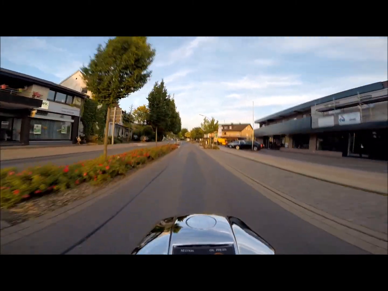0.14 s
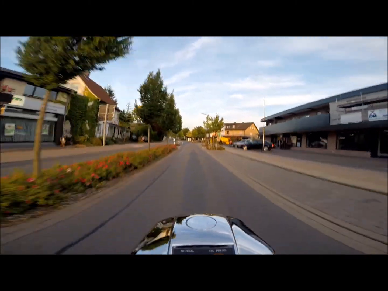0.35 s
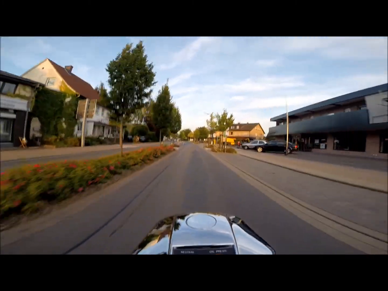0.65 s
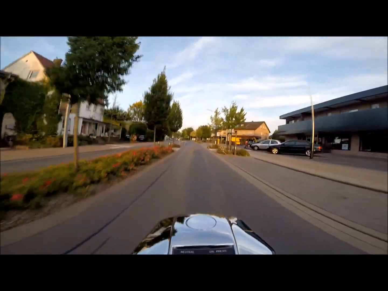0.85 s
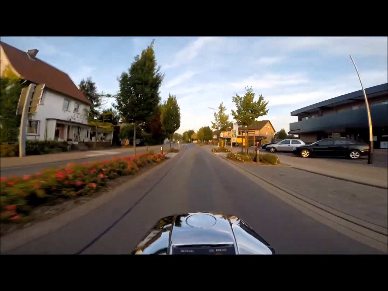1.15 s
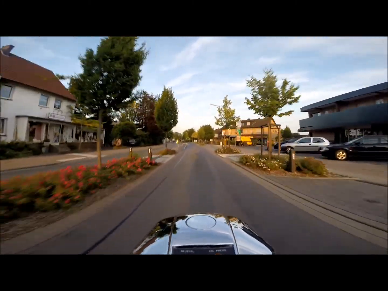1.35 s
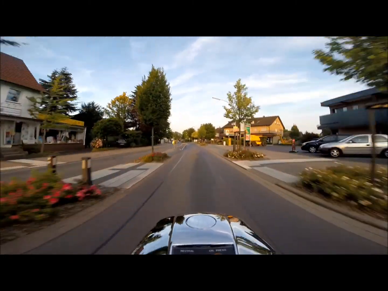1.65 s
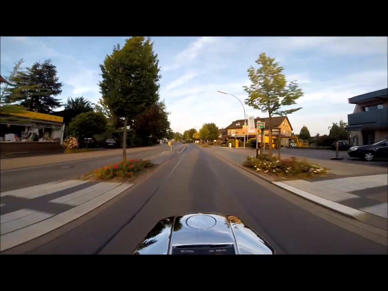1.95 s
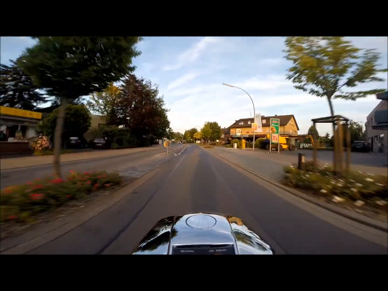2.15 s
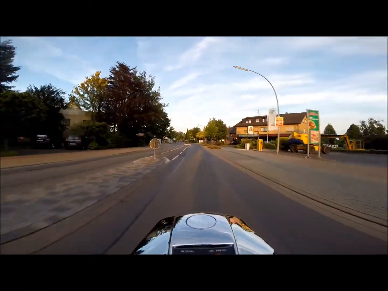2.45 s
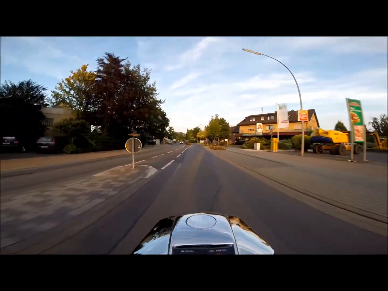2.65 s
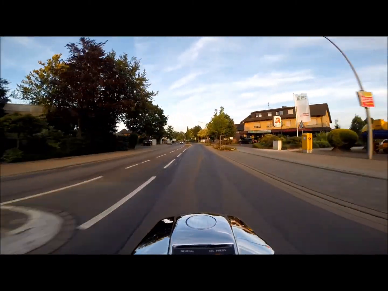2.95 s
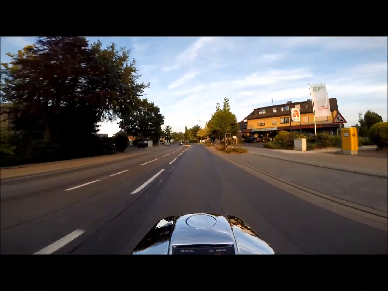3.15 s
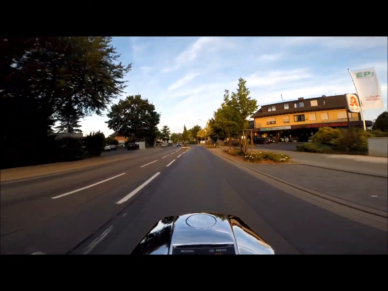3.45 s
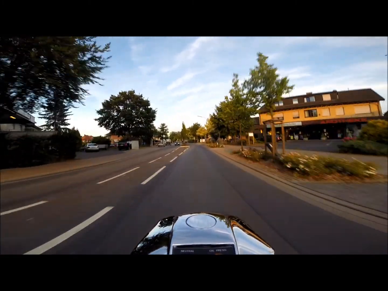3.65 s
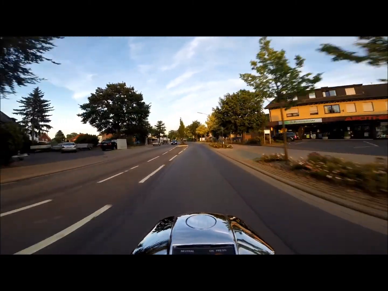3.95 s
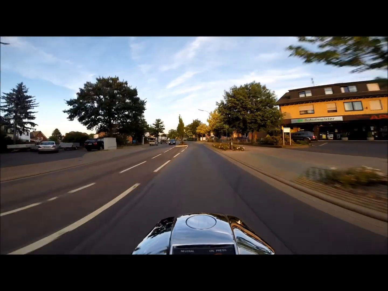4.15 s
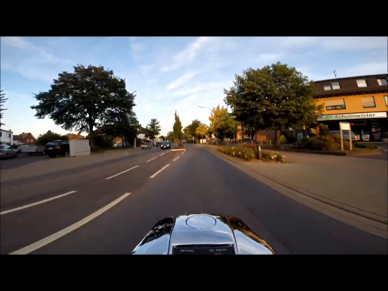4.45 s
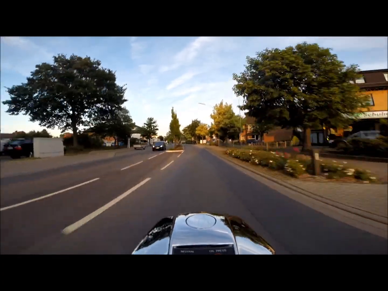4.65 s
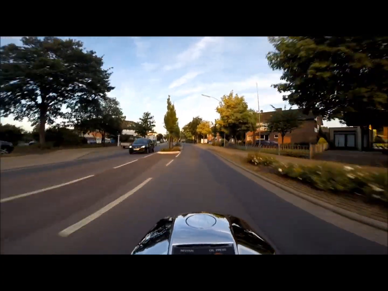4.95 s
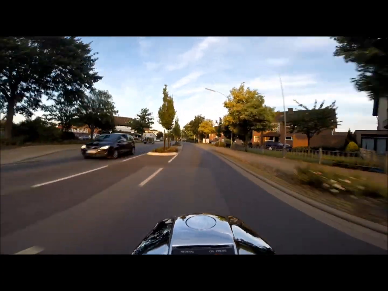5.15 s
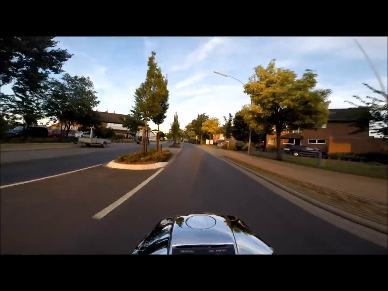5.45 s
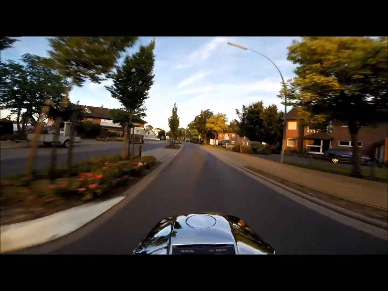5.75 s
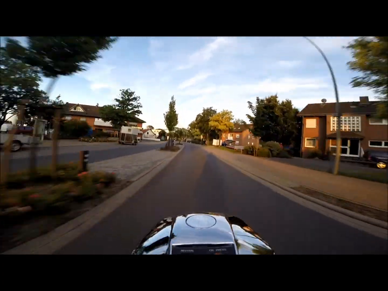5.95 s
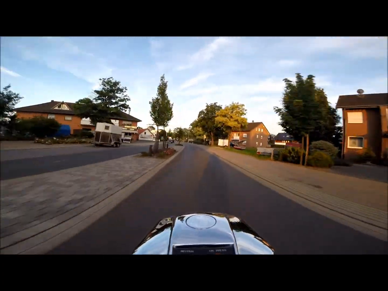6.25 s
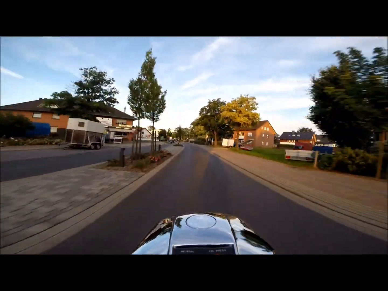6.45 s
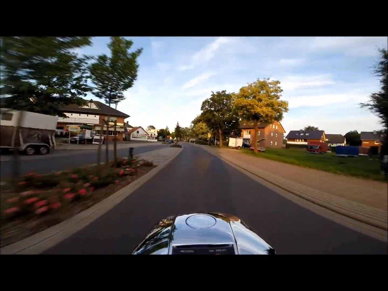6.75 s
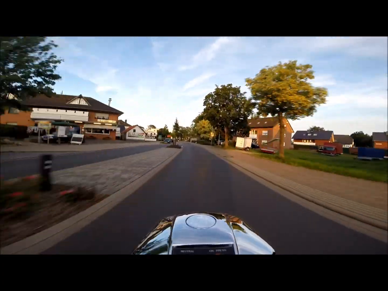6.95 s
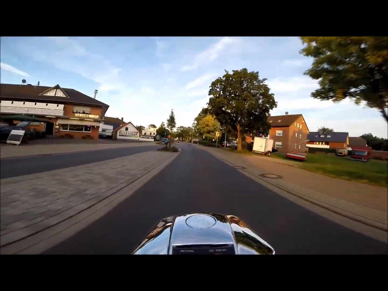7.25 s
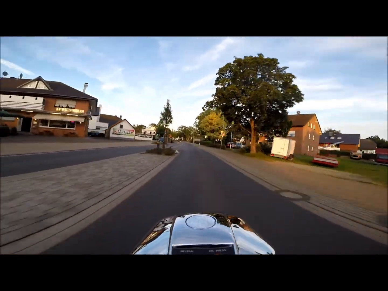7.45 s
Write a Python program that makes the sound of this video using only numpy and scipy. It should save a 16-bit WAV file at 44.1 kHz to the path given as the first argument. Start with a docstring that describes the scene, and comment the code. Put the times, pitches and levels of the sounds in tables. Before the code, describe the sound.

Close up from the saddle, a vintage motorcycle accelerates with a deep, loping beat and ragged exhaust puffs, topped by ringing mechanical clatter and small metallic ticks. The throttle shuts briefly for a gear change and the pitch falls. It reopens with a short intake bark, and the engine rises gently to a steady pace over a low bed of riding wind.

```python
"""On the road, in the seat of an old air-cooled V-twin motorcycle: it pulls away, changes up near 4 s
and cruises. Uneven firing pulses drive the exhaust, a loping boom with ragged silencer puffs on top.
The intake barks when the throttle opens at low speed. Valve gear and chains clatter through the
ringing metal of the engine, loose parts tick, and a soft bed of wind rumbles underneath."""
import sys
import numpy as np
from scipy import signal
from scipy.fft import rfft, irfft
from scipy.io import wavfile
from scipy.ndimage import uniform_filter1d

SR = 44100
rng = np.random.default_rng(int(sys.argv[2]) if len(sys.argv) > 2 else 0)


def unload_audio(sound):
    """Save the sound as a 16-bit wav file, at the path given as the first command line argument."""
    columns = np.transpose(np.atleast_2d(sound))
    # keep every value between -1 and 1, then stretch to whole-number steps
    steps = np.round(np.clip(columns, -1, 1) * 32767)
    wavfile.write(sys.argv[1], SR, steps.astype(np.int16))


N = 335601
TIME = np.arange(N) / SR
BINS = np.fft.rfftfreq(16384, 1 / SR)

# Levels in the tables are relative; each layer gets its final gain in its function.
# the revs, in crankshaft turns a second: time_s, crank_hz
REVS = [(0, 42.82), (0.16, 38.36), (0.31, 39.54), (0.58, 39.51), (1.3, 41.94), (2.27, 47.45), (3.32, 52.86),
        (3.77, 54.66), (3.88, 51.09), (4.38, 40.19), (4.48, 40.73), (5.5, 43.9), (6.04, 44.79),
        (7.32, 46.26), (7.61, 46.34)]
# the rider's hand, from 0 (shut) to 1 (wide open): time_s, opening
THROTTLE = [(0, 0.16), (.22, 0.2), (.3, 0.47), (.62, 0.4), (.7, 0.59), (1.3, 0.78), (2.05, 0.89),
            (2.8, 0.55), (3.45, .95), (3.82, 0.57), (3.88, 0.06), (4.42, 0.19), (4.475, .8), (4.75, 1),
            (5.5, .9), (6.5, 0.75), (7.61, 0.6)]
# resonances of cases, fins and tinware: pitch_hz, width_hz, level_db
CASING_MODES = [(733, 140, -22.5), (1036, 110, -7), (1165, 165, -11), (1428, 85, -4), (1550, 190, -8.5),
                (1953, 154, 1), (2354, 116, -4.5), (2633, 63, -8), (2970, 320, -15.5), (3550, 240, -18.5),
                (4390, 370, -25), (4803, 120, -20.5), (5404, 118, -14.5), (5690, 310, -19),
                (6314, 494, -20), (7470, 195, -25.5), (7980, 960, -36), (9250, 280, -33.5),
                (10430, 710, -44), (11560, 205, -55), (12800, 920, -52.5)]
# the sharpest ticks of loose metal: start_s, level_db
SHARP_TICKS = [(0.6714, -27), (1.4333, -26), (1.5184, -24.5), (1.7492, -26), (1.8908, -22.5),
               (2.0446, -20.5), (3.5848, -23.5), (3.6227, -21), (3.7337, -23), (3.8452, -20), (5.292, -26),
               (6.4238, -21), (6.4776, -21.5), (6.6448, -22.5), (6.9484, -21.5), (7.2215, -21)]
# thin parts that ring on when the valve gear strikes them: pitch_hz, t60_s, level_db
PING_MODES = [(1439, 0.037, -1), (1962, 0.083, 1), (2070, 0.038, -2.5), (2427, 0.022, 6),
              (3580, 0.039, -5.5)]
# the fader ride of the mechanical clatter: time_s, level_db
CLATTER_RIDE = [(0.0, -25), (0.06, -24.5), (0.19, -30), (0.57, -33), (0.74, -27.5), (1.38, -26),
                (2.31, -19), (3.01, -23), (3.5, -20.5), (3.81, -23.5), (4.03, -19.5), (4.54, -29.5),
                (4.68, -24.5), (5.11, -25), (6.12, -22.5), (6.46, -19.5), (7.5, -20), (7.61, -20.5)]
# how loose parts, chains, valve gear and intake snaps each drive the metal: frequency_hz, level_db
RATTLE_FORCE = [(500, -18.5), (2000, -12), (3500, -2), (5400, -10), (6500, -2.5), (11000, 4.5), (14000, -2)]
CHAIN_FORCE = [(500, -31), (2500, -9.5), (4000, -4), (5400, 4.5), (7500, 0), (9300, 4.5), (11000, -19),
               (14000, 0)]
VALVE_FORCE = [(500, -1.5), (1000, 2), (2000, 0), (3500, -0.5), (5400, -4.5), (7500, -14), (14000, -6)]
SNAP_FORCE = [(500, 4), (1200, -2.5), (2000, 5.5), (3000, 15), (4500, 5.5), (7000, -11.5), (14000, -3)]
# resonances of the intake tract: pitch_hz, width_hz, level_db
INTAKE_MODES = [(234, 47, 1), (298.6, 46, -1), (375, 27, -10.5), (544, 230, -20.5)]
# harmonics of the uneven firing, which give the lope: multiple_of_cycle_rate, level_db
LOPE_HARMONICS = [(3, -27.5), (5, -27.5), (6, -28), (7, -31.5), (8, -38), (10, -42.5)]
# how the pipe colours a harmonic passing through it: frequency_hz, gain_db
PIPE_EQ = [(60, -1), (120, -4), (140, -17), (160, -3.5), (185, 1.5), (215, 4), (260, -20)]
# resonances of the silencer shell: pitch_hz, width_hz, level_db
SILENCER_MODES = [(382.1, 39.7, 3), (425, 19, -0.5), (547, 370, -35.5)]
# balance of the three exhaust notes across the revs: crank_hz, boom_db, drone_db, pipe_tone_db
EXHAUST_BALANCE = [(38.7, -10.5, -29, -48), (39.9, -11.5, -37.5, -38), (41.54, -10.5, -29.5, -26),
                   (42.9, -13.5, -26, -28), (45.46, -16.5, -25.5, -25.5), (46.37, -20.5, -22, -35),
                   (48.2, -19.5, -19.5, -23.5), (50.3, -20, -20.5, -45), (57, -13.5, -20, -54)]
# how far the boom trails the crank: crank_hz, lag_turns
BOOM_LAG = [(39, 0.486), (44, 0.23), (46, 0.48), (49, 0.33), (54.5, 0.77)]


def amp(db):
    """Decibels to gain."""
    return 10 ** (np.asarray(db) / 20)


def curve(table):
    """An automation lane: the table's points joined by straight lines in time."""
    return np.interp(TIME, *np.transpose(table))


def steady(x, span_s=0.41):
    """Levels x to an rms of 1 over a sliding window."""
    size = int(span_s * SR / 2)
    power = uniform_filter1d(uniform_filter1d(x * x, size), size)
    return x / np.sqrt(abs(power) + 1e-20)


def wander(hz):
    """Smooth random drift of rms 1, up to about this rate."""
    rolloff = np.exp(-(np.fft.rfftfreq(N, 1 / SR) / hz) ** 2)
    drift = irfft(rfft(rng.standard_normal(N)) * rolloff, N)
    return drift / drift.std()


def ring(x, modes, force=((1, 0), (2, 0))):
    """Plays x through a resonant body, coloured by a force spectrum (flat by default)."""
    power = sum(amp(db) ** 2 / (1 + ((BINS - hz) / width) ** 2) ** 2 for hz, width, db in modes)
    force_hz, force_db = np.transpose(force)
    gain = np.sqrt(power) * amp(np.interp(np.log(BINS + 1), np.log(force_hz), force_db))
    # minimum phase, so the ringing follows each blow
    log_gain = np.log(np.r_[gain, gain[-2:0:-1]] + 1e-6)
    response = np.fft.ifft(np.exp(np.conj(signal.hilbert(log_gain)))).real[:len(BINS)]
    return signal.oaconvolve(x, response / abs(response).max())[:N]


def blows(times, sizes):
    """A train of one-sample clicks."""
    inside = (times > 0) & (times < TIME[-1])
    return np.bincount((times[inside] * SR).astype(int), sizes[inside], N)


def chatter(hits, decay_ms):
    """Each hit breaks up into a short burst of tiny contacts."""
    envelope = signal.lfilter([1], [1, -np.exp(-1000 / (decay_ms * SR))], hits)
    return envelope * rng.standard_normal(N)


def each_cycle(cycle, place, jitter_ms, spread_db):
    """One blow at the same place in every four-stroke cycle, never quite alike."""
    times = np.interp(np.arange(int(cycle[-1]) + 1) + place, cycle, TIME)
    late, size = rng.standard_normal((len(times), 2)).T
    return blows(times + late * jitter_ms / 1000, amp(spread_db * size))


def cam_strikes(cycle, count, jitter_ms, spread_db):
    """A pattern of blows at scattered cam angles that repeats every cycle."""
    return sum(each_cycle(cycle, (k + rng.random()) / count, jitter_ms, spread_db) for k in range(count))


def firings(cycle, place, rear_db, jitter_ms, spread_db):
    """The limping beat: the two cylinders fire 315 and 405 degrees apart."""
    front = each_cycle(cycle, place, jitter_ms, spread_db)
    rear = each_cycle(cycle, place + 315 / 720, jitter_ms, spread_db)
    return front + amp(rear_db) * rear


def coasting(below_opening=0.63):
    """0 while the engine pulls, rising to 1 as the throttle shuts and the wheel drives the engine."""
    return np.clip(1 - curve(THROTTLE) / below_opening, 0, 1)


def with_revs(full_db, knee_hz, db_per_hz):
    """Gain of a layer that builds with the revs up to a knee."""
    return amp(full_db - db_per_hz * np.maximum(knee_hz - curve(REVS), 0))


def with_throttle(range_db, cruise_opening=0.8):
    """Gain that moves by range_db from shut to wide open; 1 at the cruise opening."""
    return amp(range_db * (curve(THROTTLE) - cruise_opening))


def with_clatter(level_db, slope, reference_db=-22):
    """Gain that follows the clatter's ride, passing level_db when the ride is at the reference."""
    return amp(level_db + slope * (curve(CLATTER_RIDE) - reference_db))


def wind():
    """The bed: deep, soft buffeting of the air stream."""
    gusts = amp(-28.5 + 1.7 * wander(hz=4))
    rumble = ring(rng.standard_normal(N), [(33, 11, 0), (85, 45, -20)])
    return gusts * steady(rumble, span_s=1)


def rattle(cycle, ticks_per_s=170):
    """Loose metal shaken by the engine: a spray of small ticks and a knock at each firing."""
    sizes = amp(1.8 * np.minimum(rng.exponential(1, N), 2.5))
    hits = sizes * (rng.random(N) < ticks_per_s / SR)
    spray = steady(ring(chatter(hits, decay_ms=1.6), CASING_MODES, RATTLE_FORCE))
    jolts = firings(cycle, place=0.7, rear_db=-5, jitter_ms=0.8, spread_db=4)
    knocks = steady(ring(chatter(jolts, decay_ms=2), CASING_MODES, RATTLE_FORCE), span_s=0.52)
    shake = amp(np.maximum(curve(REVS) - 52.2, 0))  # 1 dB harder per Hz near the top of the gear
    loose_metal = amp(-4.5) * spray + amp(-5.5) * shake * knocks
    return loose_metal * with_clatter(-33, slope=0.96) * with_throttle(18.6)


def sharp_ticks():
    """Accents: single hits of loose metal that poke out of the rattle."""
    start_s, level_db = np.transpose(SHARP_TICKS)
    hits = blows(start_s, amp(level_db - 2))
    return ring(chatter(hits, decay_ms=3.2), CASING_MODES, RATTLE_FORCE)


def backlash(cycle):
    """When coasting, slack gear teeth slap twice a crank turn and keep the cover ringing."""
    slaps = amp(3 * np.cos(2 * np.pi * 4 * cycle)) * rng.standard_normal(N)
    cover = steady(ring(slaps, [(1910, 140, 8), (1450, 94, -5)]))
    return cover * with_revs(-24, knee_hz=44, db_per_hz=1.2) * coasting()


def pings(cycle):
    """Each thin part is struck twice a cycle, at its own cam angles, and rings on."""
    t = np.arange(SR // 10) / SR
    sound = np.zeros(N)
    for hz, t60, db in PING_MODES:
        strikes = cam_strikes(cycle, count=2, jitter_ms=1.505, spread_db=8)
        ping = amp(db - 60 * t / t60) * np.sin(2 * np.pi * hz * t)
        sound += signal.oaconvolve(strikes, ping)[:N]
    return steady(sound, span_s=1)


def chain_hiss(swell):
    """The bright top of the clatter: the chains' fine contacts sizzle through the casing."""
    hiss = steady(ring(swell * rng.standard_normal(N), CASING_MODES, CHAIN_FORCE))
    return hiss * with_clatter(-39.5, slope=1.1) * with_throttle(-0.5)


def clatter(cycle):
    """Tappets and gears knock over a churn of small contacts and chain hiss that swell with each turn."""
    knocks = cam_strikes(cycle, count=12, jitter_ms=0.07, spread_db=1)
    swell = amp(0.23 * np.cos(2 * np.pi * (2 * cycle - 0.55)) + 2.2 * wander(hz=112))
    churn = swell * rng.standard_normal(N)
    drive = amp(-5.5) * steady(knocks) + steady(churn)
    metal = steady(ring(drive, CASING_MODES, VALVE_FORCE)) + amp(-8.5) * pings(cycle)
    valves_db = curve(CLATTER_RIDE) - coasting()  # up to 1 dB softer off the throttle
    return steady(metal) * amp(valves_db) + chain_hiss(swell)


def intake(cycle):
    """The bark: a gulp of air for each cylinder, one much stronger, with a snap against the metal."""
    gulps = firings(cycle, place=0.69, rear_db=-8.5, jitter_ms=0.16, spread_db=2.2)
    snaps = firings(cycle, place=0.695, rear_db=-9, jitter_ms=0.15, spread_db=1.5)
    body = steady(ring(gulps, INTAKE_MODES))
    bite = steady(ring(chatter(snaps, decay_ms=1.3), CASING_MODES, SNAP_FORCE))
    throttle = curve(THROTTLE)
    shut_db = 17.5 * np.maximum(1 - throttle / 0.66, 0)
    # the bark fades as the engine catches up, later on a wider throttle
    knee_hz = 37.26 + 5.4 * throttle
    fade_db = np.clip(6 * (curve(REVS) - knee_hz), 0, 16)
    return (body + amp(-10.5) * bite) * amp(-24.5 - shut_db - fade_db)


def lope(cycle):
    """The firing harmonics slide through the fixed resonance of the pipe as the revs change."""
    cycle_hz = curve(REVS) / 2
    sound = np.zeros(N)
    for multiple, level_db in LOPE_HARMONICS:
        pipe_db = np.interp(multiple * cycle_hz, *np.transpose(PIPE_EQ))
        waver_db = 1.2 * wander(hz=6)
        # the pipe holds the higher harmonics back, smearing each beat over the cycle
        delay = 0.72 + 0.055 * (multiple - 3)
        sound += amp(level_db + pipe_db + waver_db) * np.cos(2 * np.pi * multiple * (cycle - delay))
    return np.sqrt(2) * sound * with_throttle(7.5)


def exhaust_notes(crank):
    """The weight of the engine: boom, drone and pipe tone, three clean notes locked to the crank."""
    crank_hz = curve(REVS)
    table_hz, *levels_db = np.transpose(EXHAUST_BALANCE)
    boom_gain, drone_gain, tone_gain = (amp(np.interp(crank_hz, table_hz, db)) for db in levels_db)
    # coasting: the boom sinks and, at high revs, collapses; the drone grows
    sink_db = 6.5 + 1.5 * np.maximum(crank_hz - 44.3, 0)
    boom_gain *= with_throttle(-6.5) * amp(-sink_db * coasting())
    drone_gain *= with_throttle(0.5) * amp(4.5 * coasting())
    tone_gain *= with_throttle(18)
    lag_turns = np.interp(crank_hz, *np.transpose(BOOM_LAG))
    boom = boom_gain * np.cos(2 * np.pi * (crank - lag_turns))
    drone = drone_gain * np.cos(2 * np.pi * 2 * crank)
    pipe_tone = tone_gain * np.cos(2 * np.pi * (4.5 * crank - 0.48))
    return np.sqrt(2) * (boom + drone + pipe_tone)


def exhaust(cycle):
    """The lead voice: clean notes, roughened by turbulence in the pipe and puffs in the silencer."""
    crank = 2 * cycle
    surge = amp(3.2 * np.cos(2 * np.pi * (crank - 0.3)))
    turbulence = steady(ring(surge * rng.standard_normal(N), [(210.7, 30.4, -3), (121.4, 23.4, -4)]))
    turbulence *= with_revs(-27, knee_hz=44.9, db_per_hz=1.5)
    pulses = firings(cycle, place=0.52, rear_db=-6.5, jitter_ms=0.3, spread_db=2.5)
    thuds = steady(ring(pulses, SILENCER_MODES))
    breath = steady(ring(surge * rng.standard_normal(N), SILENCER_MODES))
    puffs = steady(thuds + amp(4) * breath)
    puffs *= with_revs(-28, knee_hz=47.07, db_per_hz=1.06) * with_throttle(1.5)
    return exhaust_notes(crank) + turbulence + puffs


def scene():
    """The mono mix: gas and metal run off one crank, two turns to a cycle, over the wind."""
    cycle = np.cumsum(curve(REVS)) / SR / 2
    gas = exhaust(cycle) + lope(cycle) + intake(cycle)
    metal = clatter(cycle) + backlash(cycle) + rattle(cycle) + sharp_ticks()
    return (gas + metal + wind())[None]


def record(dry, low_cut_hz=17, high_cut_hz=15170):
    """The finish: a low cut, soft ends and a steep high cut."""
    low_cut = signal.butter(3, low_cut_hz, "highpass", fs=SR, output="sos")
    high_cut = signal.firwin(511, high_cut_hz, window=("kaiser", 9), fs=SR)
    sound = signal.sosfilt(low_cut, dry) * signal.windows.tukey(N, 0.001)
    return signal.oaconvolve(sound, high_cut[None], "same")


dry = scene()
out = record(dry)
unload_audio(out)
```